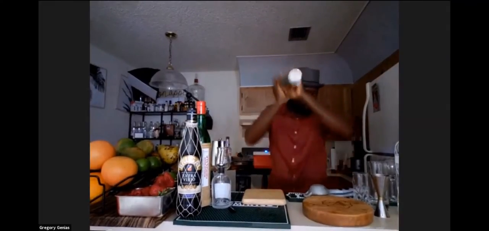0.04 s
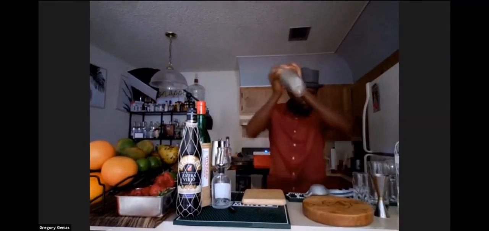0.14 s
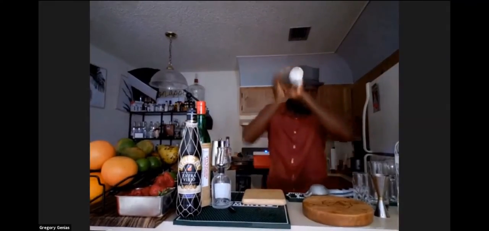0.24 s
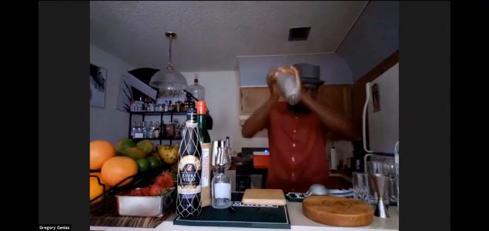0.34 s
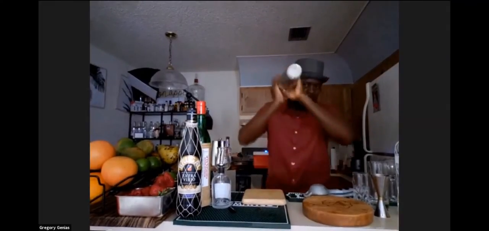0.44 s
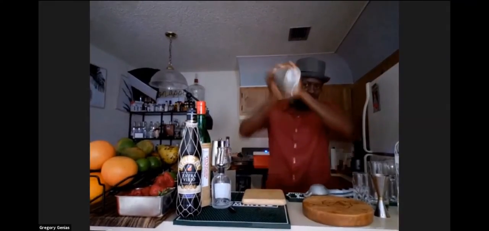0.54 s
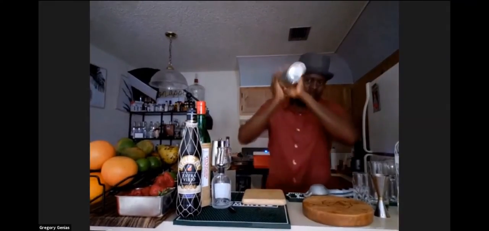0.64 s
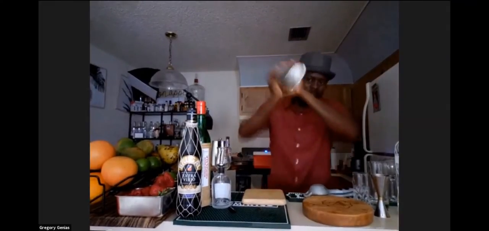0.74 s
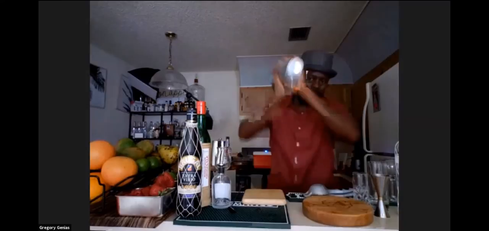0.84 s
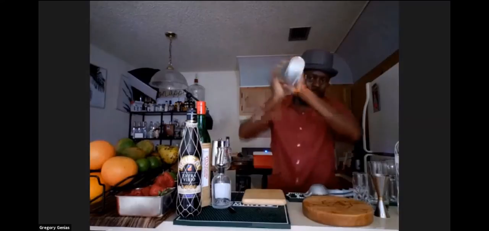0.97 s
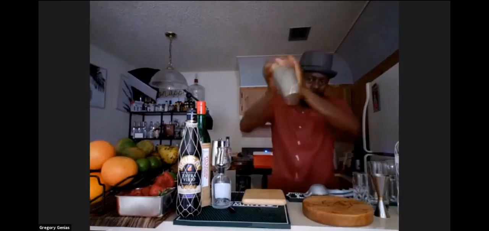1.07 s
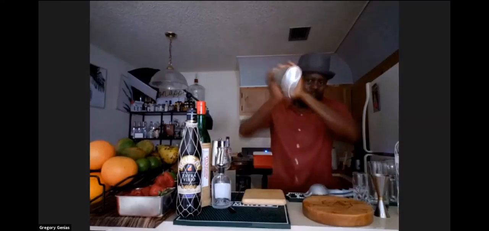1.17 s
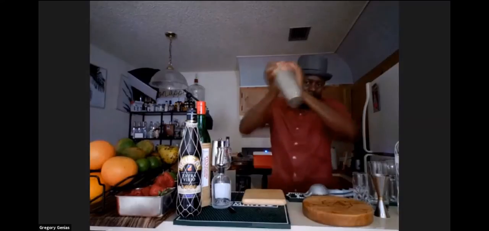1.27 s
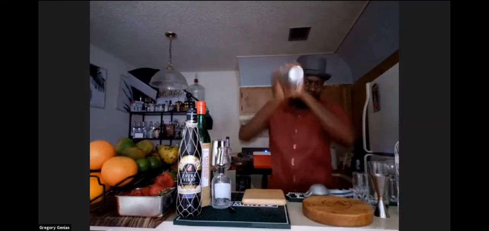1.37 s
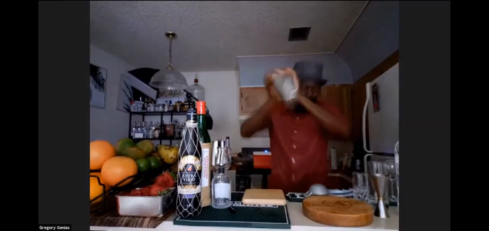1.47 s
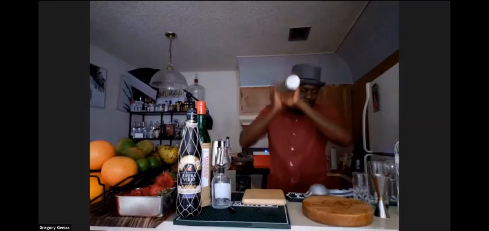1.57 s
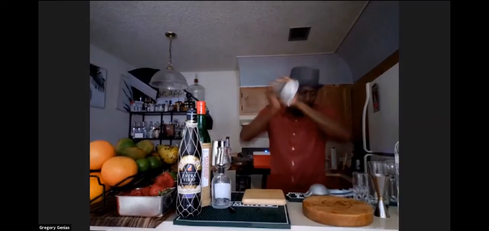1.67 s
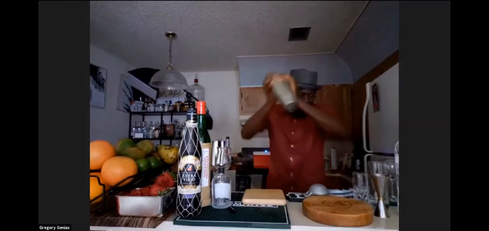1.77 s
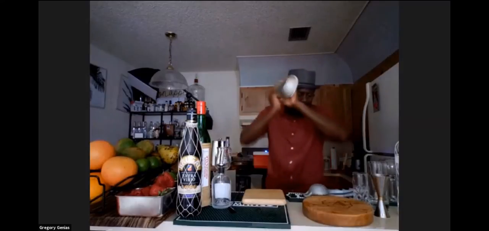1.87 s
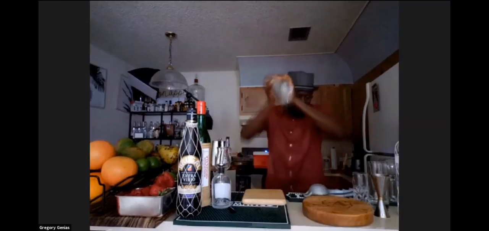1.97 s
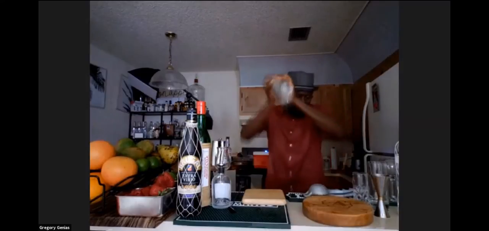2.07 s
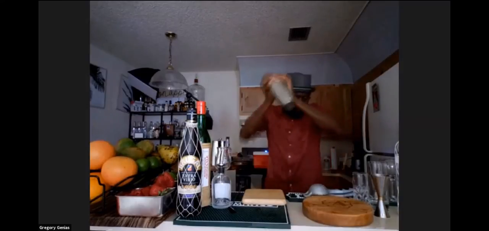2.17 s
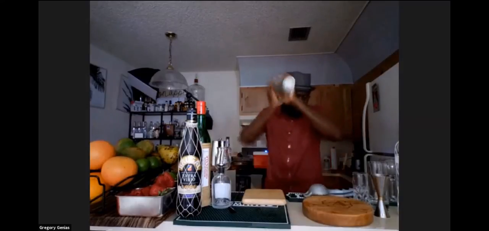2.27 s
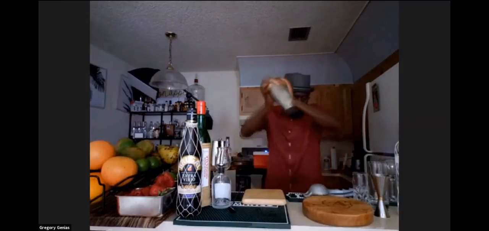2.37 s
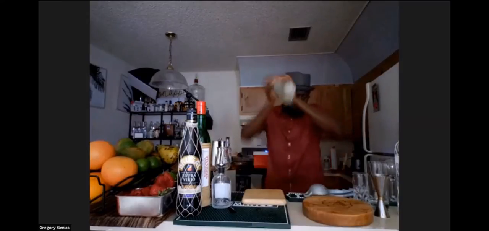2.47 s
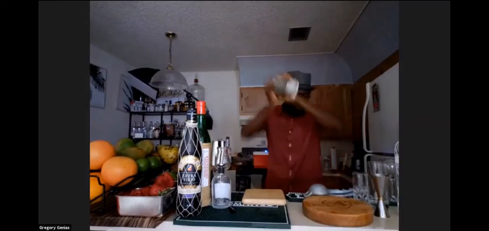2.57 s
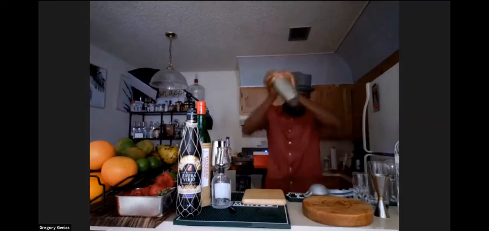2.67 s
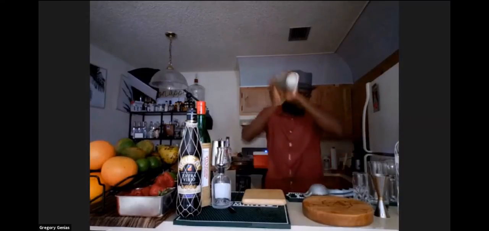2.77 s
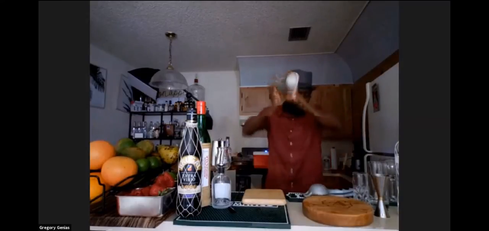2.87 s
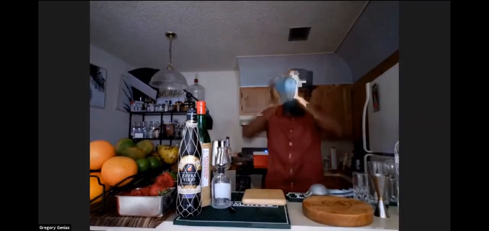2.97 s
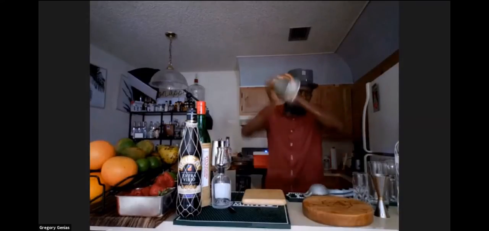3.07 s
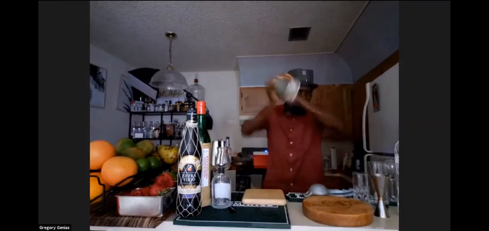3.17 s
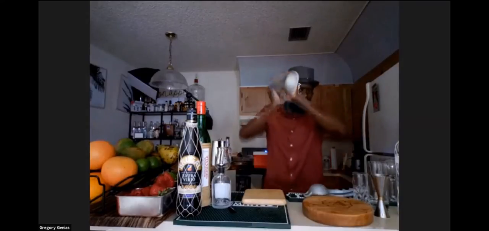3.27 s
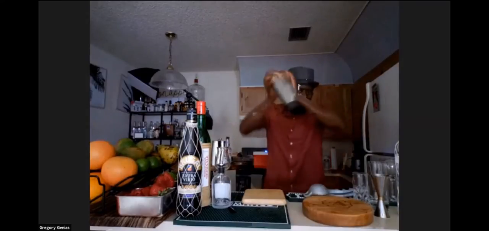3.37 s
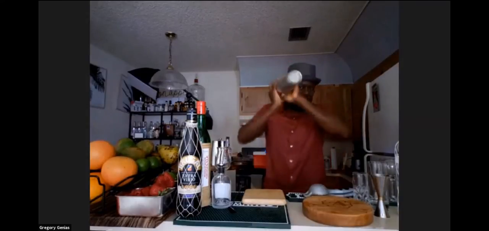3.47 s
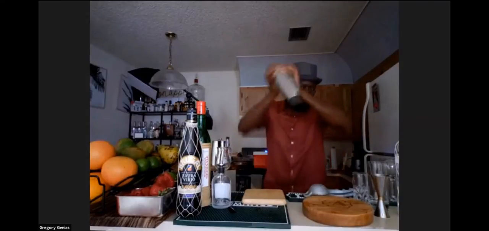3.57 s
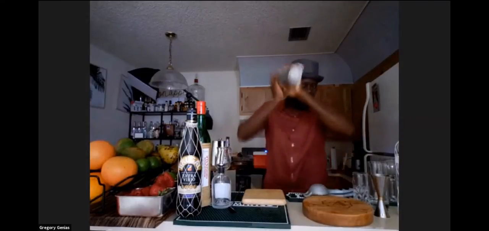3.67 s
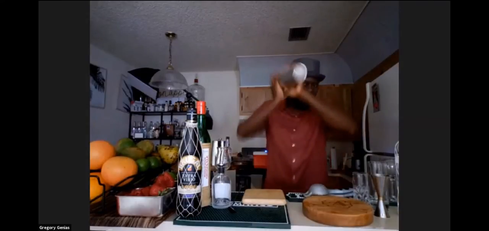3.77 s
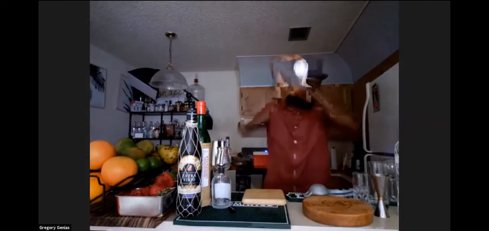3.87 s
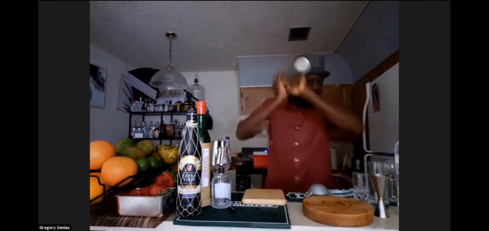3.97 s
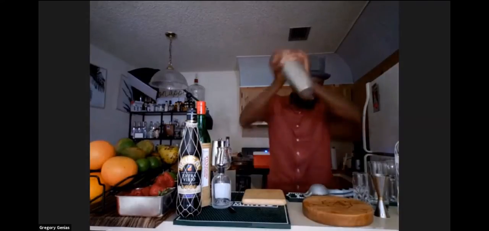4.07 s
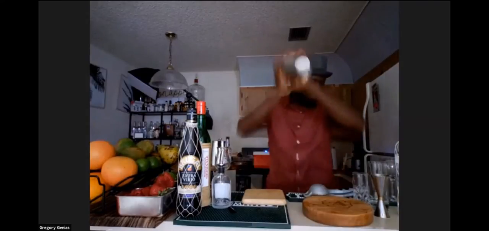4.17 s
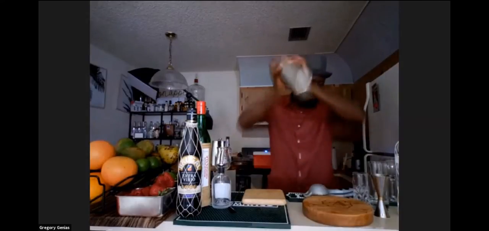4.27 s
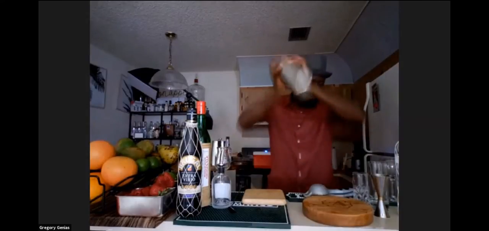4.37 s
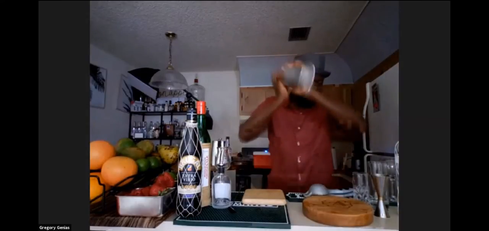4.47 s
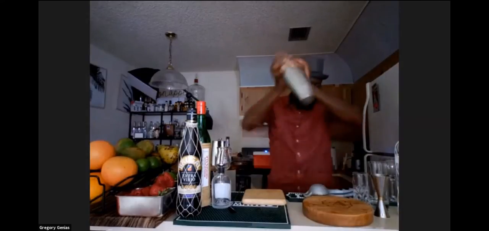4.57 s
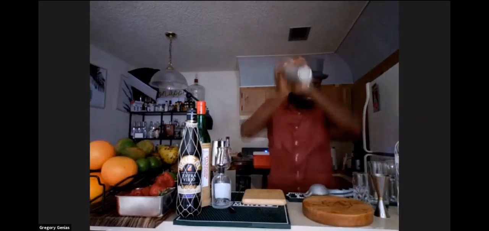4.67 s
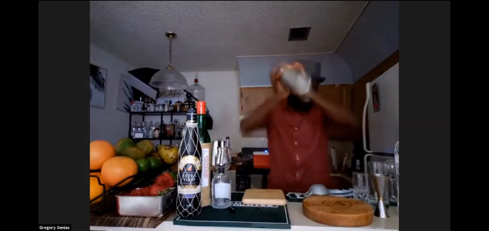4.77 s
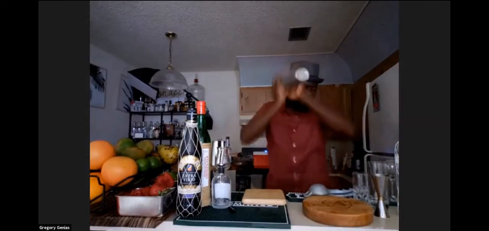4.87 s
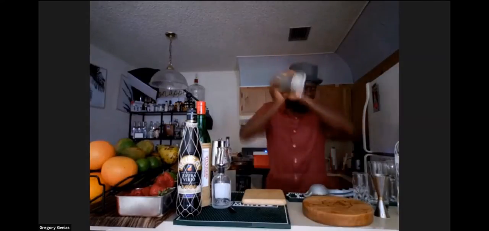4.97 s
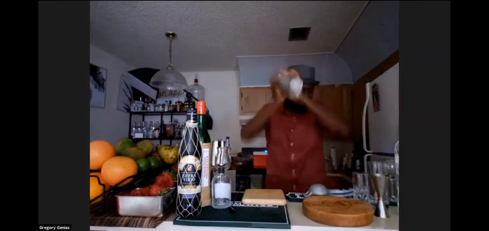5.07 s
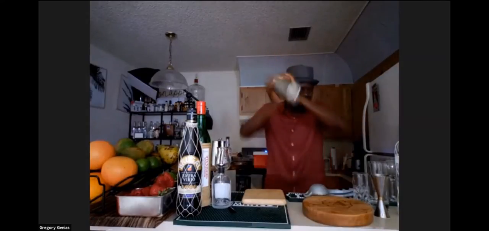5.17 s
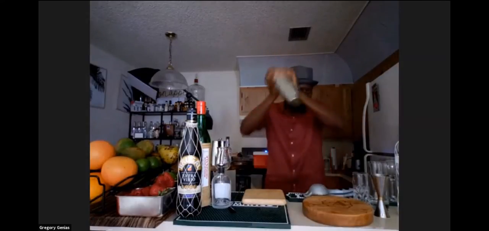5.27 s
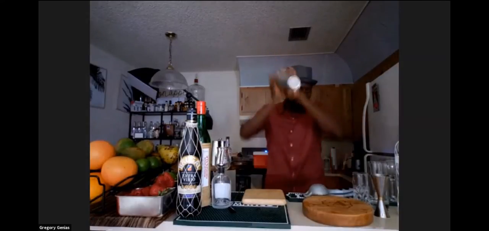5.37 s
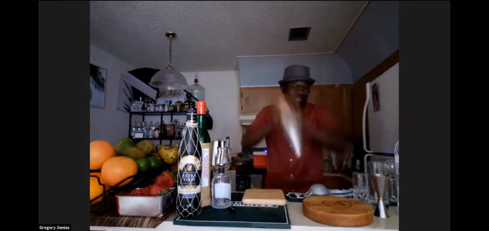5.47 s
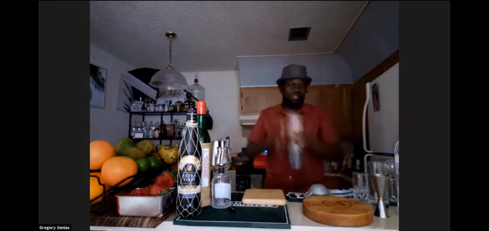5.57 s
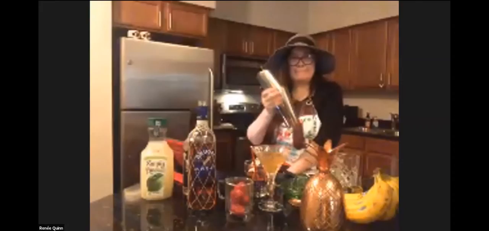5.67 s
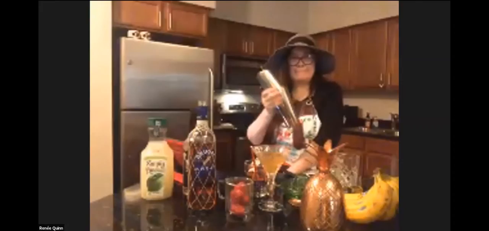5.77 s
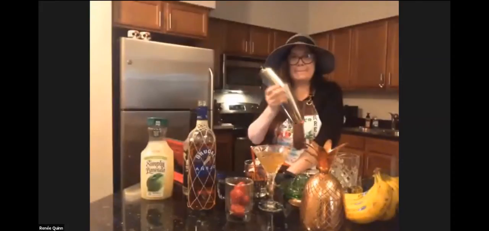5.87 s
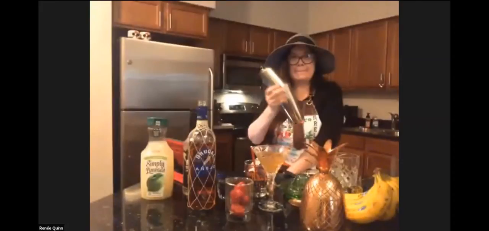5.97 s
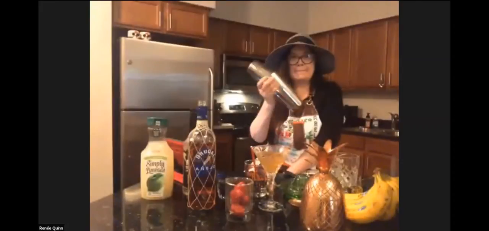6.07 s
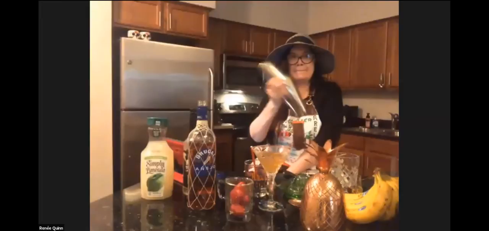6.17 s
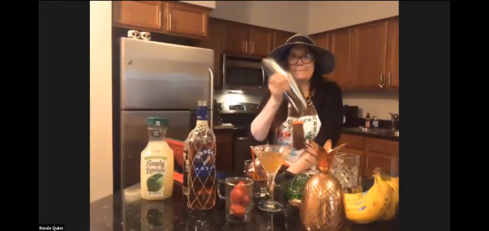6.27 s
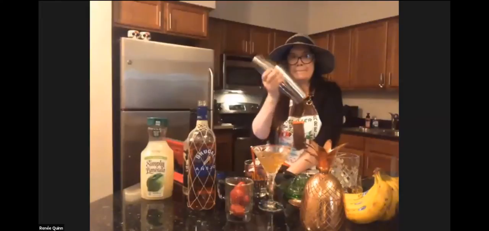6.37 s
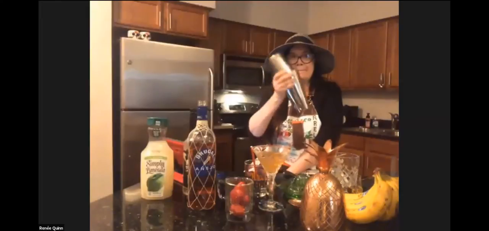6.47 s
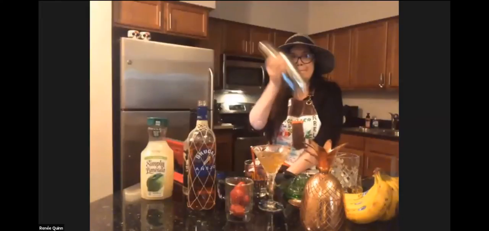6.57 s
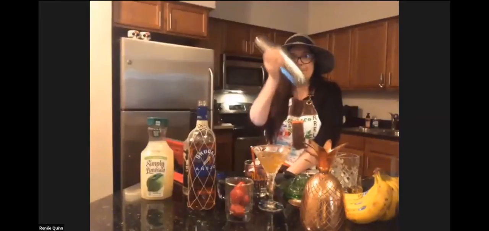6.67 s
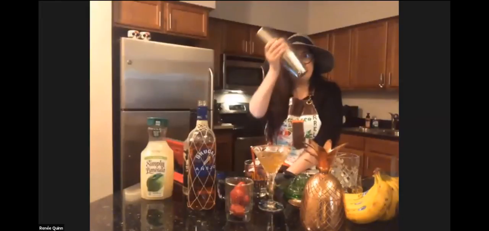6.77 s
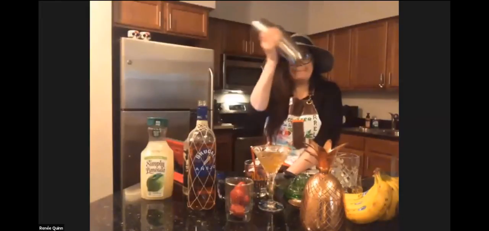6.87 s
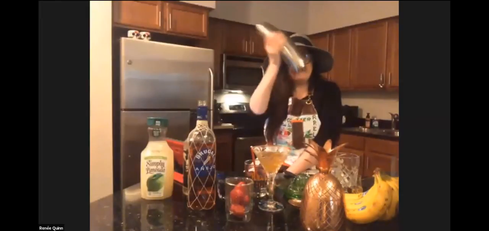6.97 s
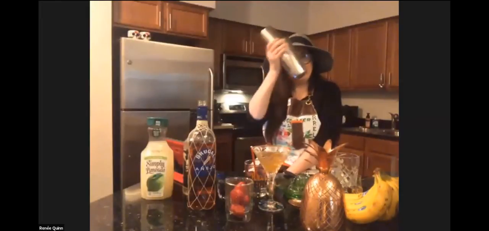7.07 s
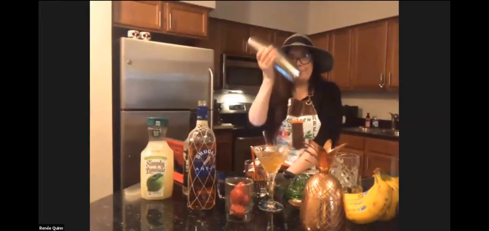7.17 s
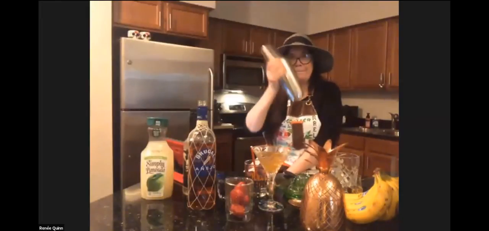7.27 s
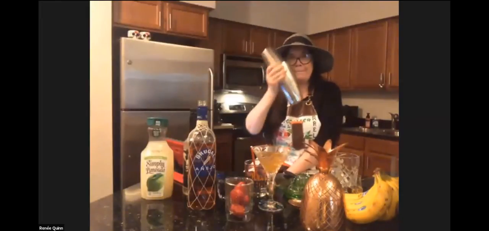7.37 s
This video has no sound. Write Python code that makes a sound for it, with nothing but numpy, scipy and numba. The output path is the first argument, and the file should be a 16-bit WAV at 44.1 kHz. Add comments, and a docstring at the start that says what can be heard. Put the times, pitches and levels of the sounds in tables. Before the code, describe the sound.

Ice rattles fast and wet in a metal cocktail shaker, then a second, slower shaker clunks dull and ringing in another kitchen.

```python
"""Kitchens, heard over a narrow call line: two cocktail shakers full of ice, one after the other.
The first is shaken fast: at each turn of the stroke froth sprays, ice knocks and tumbles, the drink surges.
These are filtered noise, resonances and small bubbles; a noise suppressor slowly closes on them.
Tones that slide in pitch are heard around the change from one shaker to the other.
The second is slower and duller: its load clunks into the ends, the steel rings and the room answers."""
import sys
import numpy as np
from scipy import signal
from scipy.fft import rfft, irfft, next_fast_len
from scipy.io import wavfile
from scipy.ndimage import uniform_filter1d
from numba import njit

SR = 44100
rng = np.random.default_rng(int(sys.argv[2]) if len(sys.argv) > 2 else 0)


def wav_record(signal):
    """Record a signal, one row per channel, as 16-bit PCM in the file named by sys.argv[1]."""
    frames = np.transpose(np.atleast_2d(signal))
    bounded = np.clip(frames, -1, 1)
    # unit amplitude maps onto the largest positive 16-bit level
    quanta = np.round(bounded * 32767).astype(np.int16)
    wavfile.write(sys.argv[1], SR, quanta)


N = 327222
TIME = np.arange(N) / SR
HANDOVER_S = 5.17  # about when the second shaker takes over


def undb(db):
    """Turn decibels into a plain gain."""
    return 10 ** (np.asarray(db) / 20)


def noise(size=N):
    """White noise: all pitches equally strong."""
    return rng.standard_normal(size)


def fade(t60, size):
    """Smooth dying away that falls by 60 dB in t60 seconds."""
    return np.exp(-np.log(1000) * TIME[:size] / t60)


def add(track, s, sound):
    """Mix a sound into a track at time s."""
    start = int(np.clip(s * SR, 0, N - 1))
    track[start:start + len(sound)] += sound[:N - start]


def blow(x, db, size):
    """Scale a hit so that its first samples have this rms level."""
    return x * undb(db) / np.sqrt(np.mean(x[:size] ** 2))


def walk(rate):
    """Smooth random wander with unit spread, taking rate steps a second."""
    hold = int(SR / rate)
    steps = np.repeat(noise(N // hold + 2), hold)
    wander = uniform_filter1d(steps, hold)[:N]
    return wander / wander.std()


def colour(x, points):
    """Filter with the given (f/Hz, level/dB) curve, without any sound ahead of its cause."""
    hz, db = np.transpose(points)
    size = 2 * next_fast_len(len(x))
    log_hz = np.log(np.fft.rfftfreq(size, 1 / SR) + 1)
    log_gain = np.log(undb(np.interp(log_hz, np.log(hz), db)))
    # folding the cepstrum puts the whole response after time zero
    cepstrum = irfft(log_gain) * (1 + np.sign(size // 2 - np.arange(size)))
    cepstrum[0] /= 2
    response = np.exp(rfft(cepstrum))
    return irfft(rfft(x, size) * response)[:len(x)]


def ring_width(t60):
    """Width in Hz of a resonance that dies away in t60 seconds: the longer the ring, the narrower."""
    return np.log(1000) / np.pi / t60


def resonate(x, hz, width_hz):
    """One resonance, gain 1 at its centre."""
    return signal.lfilter(*signal.iirpeak(hz, hz / width_hz, fs=SR), x)


@njit
def moving_resonance(x, hz, width_hz):
    """One resonance whose centre can move every sample (a state-variable band-pass)."""
    y, band, low = np.empty(len(x)), 0., 0.
    for i in range(len(x)):
        g, k = np.tan(np.pi * hz[i] / SR), width_hz / hz[i]
        v = (band + g * (x[i] - low)) / (1 + g * (g + k))
        band, low, y[i] = 2 * v - band, low + 2 * g * v, k * v
    return y


@njit
def ring(starts, hz, t60, sizes, glide):
    """Sum of fading sine tones whose pitch rises by the share glide over their life."""
    out = np.zeros(N)
    for k in range(len(starts)):
        life = int(t60[k] * SR)
        turn = 2 * np.pi * hz[k] / SR
        z = sizes[k] + 0j
        p = np.exp(1j * turn - np.log(1000) / life)
        bend = np.exp(1j * turn * glide / life)
        for i in range(starts[k], min(starts[k] + life, N)):
            out[i] += z.imag
            z *= p
            p *= bend
    return out


def grains(rate, low_hz, high_hz, t60, scatter_db, glide):
    """A swarm of small rings, each with its own moment, pitch, life and strength."""
    when, pitch, life, size, side = rng.random((int(rate * N / SR), 5)).T
    sizes = np.sign(side - .5) * undb(-scatter_db * np.log(1 - size * .98))
    starts = (when * N).astype(np.int64)
    return ring(starts, low_hz + (high_hz - low_hz) * pitch, t60 * (.5 + life), sizes, float(glide))


def crunches(rate, t60, scatter_db):
    """Cubes meeting at random moments, each a brief burst of noise of its own strength."""
    when, size = rng.random((int(rate * N / SR), 2)).T
    strength = undb(-scatter_db * np.log(1 - size * .95))
    energy = np.bincount((when * N).astype(int), strength ** 2, N)
    power = signal.lfilter([1], [1, -undb(-120 / t60 / SR)], energy)
    x = noise() * np.sqrt(power)
    return x / x.std()


def surge(x, rows, attack_s, release_s, rest_db, size):
    """Let a sound swell, hold and ebb with each throw; rows are (start t/s, level/dB, hold t/s)."""
    # the resting level fades out just before the handover
    power = undb(rest_db) ** 2 * np.clip((HANDOVER_S - TIME) * 20, 0, 1)
    for s, db, hold in rows:
        near = slice(max(int((s - .1) * SR), 0), int((s + .3) * SR))
        age = TIME[near] - s
        shape = np.exp(np.minimum(age, 0) / attack_s - np.maximum(age - hold, 0) / release_s)
        power[near] += (undb(db) * shape) ** 2
    # even out the sound's own ups and downs first
    own_power = np.abs(uniform_filter1d(x ** 2, size)) + 1e-4 * np.mean(x ** 2)
    return x * np.sqrt(power / own_power)


# colour of the room air: (f/Hz, level/dB)
ROOM_AIR_COLOUR = [(30, -8.5), (90, -0.5), (135, 9), (200, 1), (800, 3), (1700, -24), (3100, -4),
                   (4000, -34.5), (8000, -33.5)]
# hum of an appliance in the second kitchen: (f/Hz, level/dB)
APPLIANCE_HUMS = [(134, -67.5), (269, -69), (400, -68)]


def kitchen(air_db=-60.5, hum_width_hz=12):
    """Steady room air, fainter at first; a wavering appliance hum comes in with the second kitchen."""
    second = np.clip((TIME - HANDOVER_S) * 20 + .5, 0, 1)
    air = blow(colour(noise(), ROOM_AIR_COLOUR), air_db, size=N)
    hum = np.zeros(N)
    for hz, db in APPLIANCE_HUMS:
        # noise squeezed into a very narrow band sounds like a tone that wavers
        tone = resonate(resonate(noise(), hz, hum_width_hz), hz, hum_width_hz)
        hum += blow(tone, db, size=N)
    return air * np.maximum(second, .5) + hum * second


# first shaker, one row per half stroke; levels are before each layer's own trim:
# (turn t/s, spray level/dB, ice level/dB, tumbling t/s, drink level/dB, lag of the drink t/s)
HALF_STROKES = [(-.03, -17, -29, 0.061, -40, 0.047), (0.065, -34, -28.5, 0.1, -35, 0.0039),
                (0.188, -38, -25.5, 0.049, -34, 0.034), (.278, -33, -32, 0.16, -39.5, 0.063),
                (0.401, -33.5, -31, 0.1, -40.5, 0.011), (0.518, -35.5, -31, 0.092, -40, -0.018),
                (0.647, -36, -37.5, 0.077, -43.5, -0.0024), (0.748, -38.5, -29, 0.1, -43.5, 0.00098),
                (0.834, -45, -28, 0.058, -36.5, -0.0031), (0.961, -37, -30, 0.19, -35, -0.074),
                (1.061, -36.5, -32.5, 0.025, -35.5, 0.007), (1.178, -34.5, -32, 0.13, -40, -0.00063),
                (1.328, -43, -32.5, 0.095, -42, -0.047), (1.43, -32.5, -32, 0.11, -43, -0.043),
                (1.557, -52, -30, 0.095, -38, 0.032), (1.642, -37.5, -28, 0.12, -41.5, -0.01),
                (1.772, -33, -29.5, 0.083, -35, -0.0089), (1.885, -42, -26.5, 0.1, -39, -0.048),
                (2.016, -42.5, -33, 0.081, -38, 0.036), (2.112, -34, -27.5, 0.13, -36.5, 0.0044),
                (2.245, -29.5, -32.5, 0.11, -37, -0.00099), (2.336, -36.5, -26.5, 0.13, -36.5, -0.01),
                (2.439, -41.5, -36.5, 0.14, -38, 0.039), (2.565, -39, -28, 0.083, -37.5, -0.025),
                (2.727, -39.5, -28.5, 0.049, -35, 0.011), (2.819, -35, -27, 0.16, -46.5, 0.0097),
                (2.954, -34.5, -25.5, 0.029, -29.5, 0.023), (3.052, -35, -29.5, 0.07, -42.5, -0.088),
                (3.153, -50.5, -26.5, 0.049, -36, 0.032), (3.263, -36.5, -30.5, 0.12, -54.5, 0.028),
                (3.419, -49, -32, 0.081, -46.5, 0.039), (3.533, -43.5, -29.5, 0.052, -41, -0.035),
                (3.668, -44, -33, 0.038, -43.5, 0.015), (3.743, -37, -28.5, 0.11, -39.5, -0.015),
                (3.887, -54.5, -33.5, 0.041, -37, 0.02), (3.978, -33, -30, .11, -38, -0.026),
                (4.138, -46.5, -32.5, 0.11, -39, 0.017), (4.236, -32.5, -30.5, 0.11, -39, -0.021),
                (4.361, -47.5, -36, 0.1, -42, -0.011), (4.466, -38, -36.5, 0.14, -43, -0.038),
                (4.614, -49, -30.5, 0.0074, -39, 0.016), (4.719, -33, -35.5, 0.084, -53, -0.017),
                (4.852, -53.5, -37, 0.011, -47.5, 0.078), (4.951, -37.5, -30, 0.032, -56, -0.013),
                (5.074, -49.5, -36, 0.018, -66, -.04), (5.193, -49, -67, 0.0091, -62, 0.017)]
ICE_LAG_S = .011  # the ice follows the turn


def tumbles(trim_db=0.0):
    """When, how strongly and how long the ice tumbles after each turn."""
    return [(s + ICE_LAG_S, db + trim_db, tumble_s) for s, _, db, tumble_s, _, _ in HALF_STROKES]


# colour of froth hitting the wall: (f/Hz, level/dB)
FROTH_COLOUR = [(2800, -7.5), (4000, 2), (4800, 12), (5700, -4), (6900, -5), (8000, -25.5)]


def froth_spray(swish_db=-5, squirt_db=-3, squirt_width_hz=170.0, fizz_db=-27.5, ragged_db=3.9):
    """Froth swishes and chirps on the wall around each turn, and fizzes while the ice tumbles."""
    attack_s, hold_s, release_s = 0.008, 0.0092, 0.0086
    shape = dict(attack_s=attack_s, release_s=release_s, rest_db=-np.inf, size=800)
    splashes = [(s - hold_s / 2, db + swish_db, hold_s) for s, db, *_ in HALF_STROKES]
    swish = surge(colour(noise(), FROTH_COLOUR), splashes, **shape)
    # froth squeezed out between ice and wall chirps briefly, at a wandering pitch
    squirt_hz = 4620 * np.exp(.06 * walk(10))
    squirt = moving_resonance(noise(), squirt_hz, squirt_width_hz)
    squirt = moving_resonance(squirt, squirt_hz, squirt_width_hz)
    squirt = surge(squirt, [(s, db + squirt_db, 0) for s, db, *_ in HALF_STROKES], **shape)
    # tumbling ice keeps the froth fizzing
    fizz = resonate(colour(noise(), FROTH_COLOUR), 4500, 900)
    fizz = surge(fizz, tumbles(fizz_db), **shape)
    # both come in ragged spurts
    return (swish + squirt) * undb(ragged_db * walk(110)) + fizz * undb(ragged_db * walk(25))


def flight(depth_db=-7, lead_s=0.013, width_s=0.011):
    """The load goes quiet just before each turn, while it flies from one end of the tin to the other."""
    dips = sum(np.exp(-((TIME - s + lead_s) / width_s) ** 2) for s, *_ in HALF_STROKES)
    return undb(depth_db * dips)


def wet_tin(x, width_hz=230, patchy_db=2.0, direct_db=-11):
    """Wall resonances that shift and fade as the drink loads one part of the tin, then another."""
    shift, rate = .06, 16
    rung = np.zeros(N)
    for hz in [900, 1555, 1864, 2130, 2580, 3150]:
        centre_hz = hz * np.exp(shift * walk(rate))
        rung += moving_resonance(x, centre_hz, float(width_hz)) * undb(patchy_db * walk(rate))
    return rung + undb(direct_db) * x


# colour of ice on the tin: (f/Hz, level/dB)
ICE_COLOUR = [(400, -29), (900, -10.5), (1250, 1), (1600, 6.5), (1950, 2), (2850, 2), (3400, -8),
              (4100, -15), (4800, -23), (7000, -56.5)]


def tumbling_ice(rattle_db=-0.42):
    """Many small cube contacts ring the wet tin, swelling after each turn."""
    contacts = crunches(rate=180, t60=.018, scatter_db=2.5)
    # liquid rushing between the cubes fills the gaps between their contacts
    pack = colour(wet_tin(contacts + .42 * noise()), ICE_COLOUR)
    pack = surge(pack, tumbles(), attack_s=0.016, release_s=0.028, rest_db=-79.5, size=1500)
    return undb(rattle_db) * flight() * pack


# colour of the sloshing drink: (f/Hz, level/dB)
DRINK_COLOUR = [(40, -38.5), (110, -18), (250, -4), (430, 4), (750, 5.5), (1100, -1.5), (1800, -32.5)]


def surging_drink(churn_db=-19, hold_s=0.022):
    """Bubbles of rising pitch and liquid noise surge at each stroke; tumbling ice stirs them too."""
    bubbles = grains(rate=350, low_hz=176, high_hz=1216, t60=0.023, scatter_db=2.0, glide=0.2)
    drink = colour(bubbles / bubbles.std() + noise(), DRINK_COLOUR)
    surges = [(s + lag_s, db, hold_s) for s, _, _, _, db, lag_s in HALF_STROKES]
    rows = surges + tumbles(churn_db)
    return surge(drink, rows, attack_s=.011, release_s=0.03, rest_db=-64.0, size=1300)


# colour of cracking ice: (f/Hz, level/dB)
CRACK_COLOUR = [(1500, -9.5), (4700, 3), (6800, -5), (8000, -26.5)]
# hardest single cubes hitting the tin; levels are before the trims below:
# (t/s, knock level/dB, f/Hz, thump of the tin's end level/dB)
CUBE_KNOCKS = [(0.0816, -22, 1920, -38), (0.2041, -17.5, 2250, -39.5), (0.2925, -23, 2440, -30),
               (0.414, -12, 1840, -23), (0.439, -24.5, 1660, -43), (.512, -22.5, 1610, -29.5),
               (0.539, -19.5, 2240, -47.5), (0.596, -24, 2220, -43), (0.6523, -20, 2510, -35),
               (0.7426, -22.5, 1680, -29.5), (0.7677, -21, 2220, -38), (1.079, -20, 1780, -35),
               (1.179, -23, 2630, -35), (1.195, -22.5, 2130, -41), (1.2166, -19, 1960, -50.5),
               (1.356, -17, 1700, -24), (1.4466, -17, 2180, -31), (1.5742, -21, 2680, -32),
               (1.6554, -19, 2870, -26.5), (1.668, -20.5, 1540, -36.5), (1.774, -20.5, 2030, -35),
               (2.027, -17.5, 2100, -33), (2.236, -24, 1820, -29), (2.26, -19.5, 2320, -54),
               (2.3698, -25, 2200, -51.5), (2.589, -18.5, 2050, -31.5), (2.6977, -21.5, 2870, -60),
               (2.764, -29, 1690, -27), (2.828, -25.5, 2860, -35), (2.848, -26.5, 1470, -43),
               (2.974, -27, 2000, -36.5), (2.9948, -22, 2160, -32.5), (3.0537, -16, 2080, -23.5),
               (3.07, -23.5, 2200, -33), (3.086, -21.5, 2200, -43), (3.278, -27.5, 2970, -43.5),
               (3.313, -19.5, 1380, -33), (3.3778, -17.5, 2040, -44.5), (3.435, -33, 2020, -47),
               (3.446, -24.5, 2160, -44), (3.463, -22.5, 2980, -33.5), (3.525, -22, 1400, -32.5),
               (3.5488, -20.5, 1760, -47), (3.577, -22, 1680, -41), (3.684, -25.5, 1480, -57),
               (3.7552, -27, 2770, -40.5), (3.773, -22, 2660, -44), (3.912, -26, 2300, -30),
               (3.988, -19, 2620, -26), (3.997, -19.5, 2520, -33), (4.117, -19, 2135, -36),
               (4.254, -23, 2140, -40.5), (4.374, -27.5, 1630, -32.5), (4.4669, -17, 2350, -37),
               (4.502, -25, 2180, -48), (4.623, -33, 2300, -39), (4.722, -25, 1540, -33.5),
               (4.7433, -22, 2090, -47), (4.874, -33, 2920, -49), (4.9699, -18, 2210, -42),
               (5.089, -31.5, 2810, -62), (5.099, -27, 2430, -72)]


def knocks(cube_t60=0.019, cube_db=2, thump_t60=0.016, trim_db=-1, thump_db=-2, size=2200):
    """A cube crunches on the wall and rings briefly; hands and drink damp the tin, whose end thumps."""
    contact_t60, crush_s = .014, 0.0015  # crush time of a typical blow
    crack_db, end_db, end_s = -29, 14, 0.0053
    out = np.zeros(N)
    typical_db = np.median(np.array(CUBE_KNOCKS)[:, 1])
    arrivals = np.array(HALF_STROKES)[:, 0] + ICE_LAG_S
    for s, db, hz, low_db in CUBE_KNOCKS:
        harder_db = db - typical_db
        # a harder blow crushes the cube for longer before the contact fades
        delay_db = 60 * crush_s * undb(harder_db) / contact_t60
        contact = np.minimum(fade(contact_t60, size) * undb(delay_db), 1)
        crunch = colour(noise(size) * contact, ICE_COLOUR)
        cube = colour(noise(size) * fade(cube_t60 / 2, size), ICE_COLOUR)
        cube = resonate(cube, hz, ring_width(cube_t60))
        hit = blow(crunch, 0, size=245) + blow(cube, cube_db, size=245)
        thump = colour(noise(size) * fade(thump_t60, size), DRINK_COLOUR)
        # harder blows crack brighter; brightest as the ice meets the bare end, just after the turn
        end_near = np.exp(-(np.abs(arrivals - s).min() / end_s) ** 2)
        bright_db = crack_db + harder_db / 2 + end_db * end_near
        crack = blow(colour(noise(size) * contact, CRACK_COLOUR), db + bright_db, size=245)
        hit = blow(hit, db + trim_db, size=245)
        add(out, s, hit + blow(thump, low_db + thump_db, size=350) + crack)
    return out


def fast_shaker(clump_db=1.5, room_db=-22):
    """Spray, tumbling cubes, surging drink and hard knocks, with the short echo of a small kitchen."""
    spray = froth_spray()
    load = tumbling_ice() + surging_drink()
    # the cubes arrive in clumps and drag the drink with them
    close = knocks() + load * undb(clump_db * walk(65)) + spray
    walls = noise(size=16000) * fade(t60=.3, size=16000)
    echo = signal.fftconvolve(close, walls / np.linalg.norm(walls))[:N]
    return close + undb(room_db) * echo


def suppressor(x, threshold_db=-5, learn_s=7.6, floor_db=-16, size=512):
    """The call slowly takes the rattle for noise and turns down what is weak against each band's average."""
    overlap = size * 3 // 4
    _, t, bands = signal.stft(x, SR, nperseg=size, noverlap=overlap)
    power = uniform_filter1d(np.abs(bands) ** 2, size=7, axis=0)
    power = uniform_filter1d(power, size=3, axis=1)
    average_so_far = np.cumsum(power, axis=1) / np.arange(1, len(t) + 1)
    learnt = np.minimum(t / learn_s, 1) ** 4
    gain = power / (power + undb(threshold_db) ** 2 * learnt * average_so_far + 1e-20)
    quieted = bands * np.maximum(gain, undb(floor_db))
    return signal.istft(quieted, SR, nperseg=size, noverlap=overlap)[1][:N]


# tones of the tin that slide as the drink runs over its wall; levels are before the trim below:
# (t/s, level/dB, first f/Hz, last f/Hz, length t/s)
SLIDING_TONES = [(4.641, -34, 864, 690, 0.029), (4.92, -35, 890, 734, 0.033),
                 (5.093, -29, 2890, 2440, 0.039), (5.522, -25, 761, 752, 0.11),
                 (5.547, -29, 1308, 1120, .11), (5.68, -36.5, 1425, 1370, 0.045),
                 (5.76, -31.5, 1212, 1084, 0.084), (6.015, -38, 1420, 1610, 0.051),
                 (6.146, -32, 1743, 1584, 0.12), (6.252, -34, 1550, 1430, .067),
                 (6.285, -38.5, 1080, 994, 0.071), (6.34, -37, 610, 518, .1),
                 (6.581, -30.5, 925, 898, 0.081), (6.933, -26.5, 1640, 1633, 0.071),
                 (7.17, -31.5, 1014, 910, 0.15), (7.227, -25, 762, 733, 0.052)]


def slides(trim_db=-2, rough_rate=170):
    """A tone of the wall starts quickly, slides in pitch and fades, kept uneven by tumbling ice."""
    out = np.zeros(N)
    jostle = .65 + .5 * (walk(rough_rate) + 1j * walk(rough_rate))
    jostle += .25 * (walk(600) + 1j * walk(600))
    for s, db, first_hz, last_hz, length in SLIDING_TONES:
        age = np.linspace(0, 1, int(length * SR))
        phase = 2 * np.pi * np.cumsum(first_hz + (last_hz - first_hz) * age) / SR
        tone = np.imag(np.exp(1j * phase) * jostle[int(s * SR):][:len(age)])
        swell = np.minimum(20 * age, 1) * (1 - age)
        add(out, s, undb(db + trim_db) * np.sqrt(2) * tone * swell)
    return out


# second shaker, the load landing (also played by slow_shaker); levels are before each layer's trim:
# (t/s, thud level/dB, thud f/Hz, steel ring level/dB, clatter of chips level/dB)
LANDINGS = [(4.905, -23, 964, -44, -43), (5.18, -42.5, 1150, -46, -79), (5.224, -29.5, 1160, -31.5, -53),
            (5.26, -31.5, 1130, -40, -45), (5.338, -30.5, 1044, -31.5, -40),
            (5.357, -31, 930, -32.5, -44.5), (5.507, -27.5, 920, -66, -45), (5.521, -17.5, 1028, -32, -40),
            (5.558, -29.5, 940, -38, -38), (5.659, -34, 960, -36, -50), (5.758, -26, 897, -39, -53),
            (5.911, -23, 1576, -36, -39.5), (6.06, -29, 776, -31.5, -41.5), (6.072, -39.5, 906, -26.5, -46),
            (6.086, -22.5, 880, -25.5, -58.5), (6.096, -25, 903, -28.5, -40), (6.156, -26, 935, -32.5, -40),
            (6.256, -28.5, 1190, -50, -49.5), (6.335, -28, 1200, -63, -54),
            (6.397, -25.5, 1030, -29, -44.5), (6.582, -37, 960, -48, -59), (6.598, -35, 1000, -37, -43),
            (6.675, -51, 1090, -43, -50.5), (6.755, -44, 900, -38, -57), (6.784, -36.5, 1023, -36.5, -50.5),
            (6.83, -40.5, 1300, -44.5, -59), (6.929, -29.5, 1113, -39.5, -55),
            (7.036, -29.5, 905, -25.5, -37.5), (7.089, -27.5, 1030, -35.5, -38),
            (7.159, -19.5, 1044, -47, -41.5), (7.171, -24.5, 1015, -65, -57.5),
            (7.229, -34, 1024, -44, -46), (7.305, -29.5, 935, -39, -42.5)]


def slide_in(hz=1200, width_hz=1100, swell_s=0.016, trim_db=-19.5):
    """The second load rustles along the wall, swelling into each landing and ebbing just after."""
    contacts = crunches(rate=400, t60=.03, scatter_db=6)
    rustle = resonate(resonate(contacts, hz, width_hz), hz, width_hz)
    rustle = colour(rustle, [(2800, 5.0), (4200, -28.5)])
    rows = [(s, db + trim_db, 0) for s, db, *_ in LANDINGS]
    return surge(rustle, rows, swell_s, swell_s, rest_db=-np.inf, size=1100)


def landing(strike_db, crunch_t60, settle_db, settle_t60, room_db, room_t60, size=16000):
    """One landing: a clean strike, a crunch cushioned by the drink, cubes settling, the room's tail."""
    cushion = 1 - fade(0.002, size)
    settling = undb(settle_db) * fade(settle_t60, size)
    room = undb(room_db) * fade(room_t60, size)
    push = noise(size) * cushion * (fade(crunch_t60, size) + settling + room)
    return push + undb(strike_db) * signal.unit_impulse(size)


# ringing tones of the steel wall, before the drink shifts them: (f/Hz, level/dB, t60 t/s)
STEEL_TONES = [(1634, 7, 0.091), (1688, 2, 0.13), (1752, 2.5, 0.12)]
# tones of the liquid-filled hollow, before the drink shifts them: (f/Hz)
HOLLOW_TONES = [592, 756.4, 911.5, 1030, 1203]
# colour of loose ice chips: (f/Hz, level/dB)
CHIP_COLOUR = [(100, -26.5), (900, -10.5), (1900, 0.5), (2250, -4), (2750, -4.5), (3400, -19.5),
               (4000, -35), (6000, -65.5)]


def slow_shaker(thud_width_hz=430, thud_db=-4.0, steel_db=-1, chips_db=-1):
    """Each landing drives the liquid-filled hollow, the ringing steel wall and a few loose chips."""
    hollow_t60, hollow_db, sag_per_s = .15, 6, .4
    thud_colour = [(25, -36), (220, 18.5), (700, 4.0), (1300, -1), (2200, -1.5), (3300, -9.5), (4200, -29)]
    out = np.zeros(N)
    for s, db, hz, ring_db, clatter_db in LANDINGS:
        # the drink wets the wall differently at every landing, which shifts the ring
        load = np.exp(.01 * rng.standard_normal())
        push = landing(strike_db=20, crunch_t60=.008, settle_db=-7, settle_t60=.11, room_db=-23, room_t60=.65)
        thud = resonate(push, hz, thud_width_hz) + undb(-35) * push
        thud = resonate(thud, hz, thud_width_hz)
        # the hollow's tones sag as the drink runs back
        sag = load * np.exp(-sag_per_s * TIME[:len(push)])
        hollow = sum(moving_resonance(thud, f * sag, ring_width(hollow_t60)) for f in HOLLOW_TONES)
        thud = colour(thud + undb(hollow_db) * hollow, thud_colour)
        tap = landing(strike_db=12, crunch_t60=0.0043, settle_db=-16.5, settle_t60=0.041,
                      room_db=-27, room_t60=0.45)
        # a tone that rings longer gathers the same push over a narrower band
        steel = sum(undb(tone_db) * t60 * resonate(tap, f * load, ring_width(t60))
                    for f, tone_db, t60 in STEEL_TONES)
        steel = resonate(steel, 1670, 600)
        chips = landing(strike_db=5.0, crunch_t60=0.0019, settle_db=2, settle_t60=0.3,
                        room_db=-26.5, room_t60=0.22)
        chips = colour(chips, CHIP_COLOUR)
        add(out, s, blow(thud, db + thud_db, size=660))
        add(out, s, blow(steel, ring_db + steel_db, size=660))
        add(out, s, blow(chips, clatter_db + chips_db, size=900))
    # the second line carries no treble
    return signal.sosfilt(signal.ellip(6, .5, 50, 3500, fs=SR, output="sos"), out)


def scene():
    """Both shakers and the room, on one channel; the first comes through a noise suppressor."""
    first = suppressor(fast_shaker())
    second = slide_in() + slow_shaker()
    return (kitchen() + first + slides() + second)[None]


def record(dry, ceiling=0.44, hiss_db=-48):
    """The call rounds the highest peaks and cuts the treble; a faint hiss follows the sound's level."""
    call_hz, top_hz = 7700, 11700
    rounded = dry / np.hypot(1, (dry / ceiling) ** 2) ** .5
    call = signal.sosfilt(signal.ellip(8, .2, 60, call_hz, fs=SR, output="sos"), rounded)
    hiss = undb(hiss_db) * noise() * np.abs(call)
    return signal.sosfilt(signal.ellip(8, .2, 60, top_hz, fs=SR, output="sos"), call + hiss)


dry = scene()
out = record(dry)
wav_record(out)
```